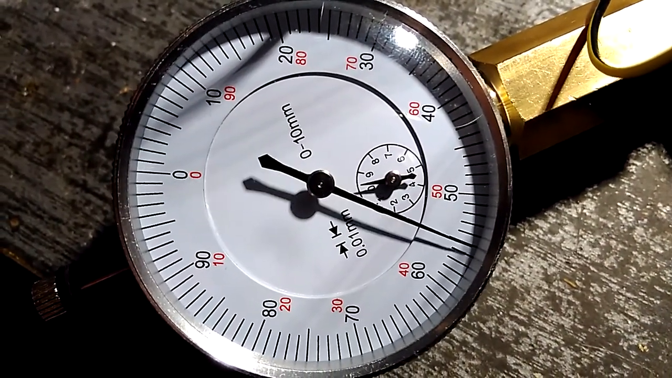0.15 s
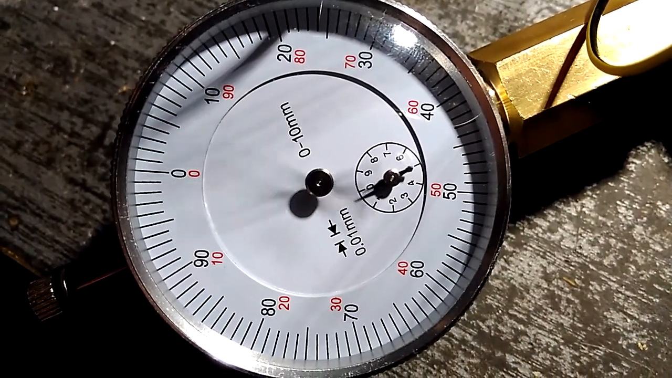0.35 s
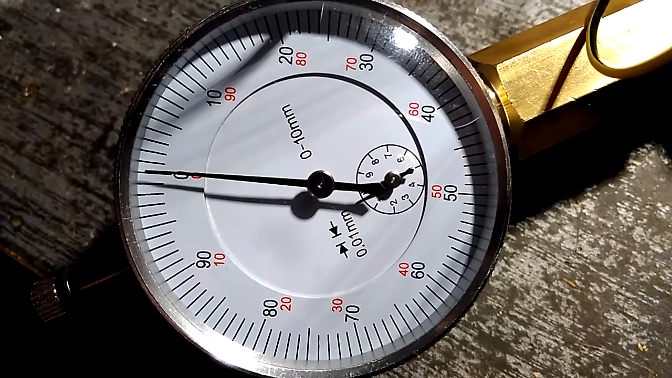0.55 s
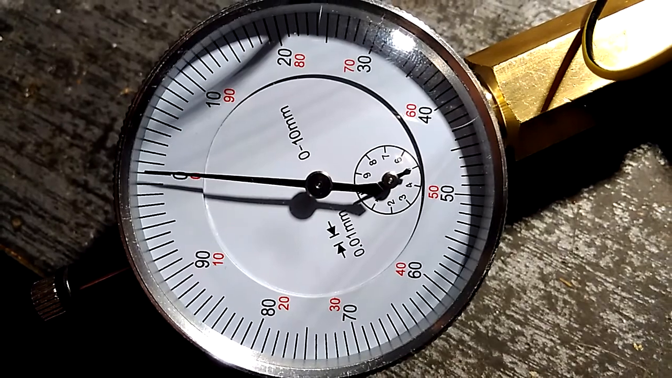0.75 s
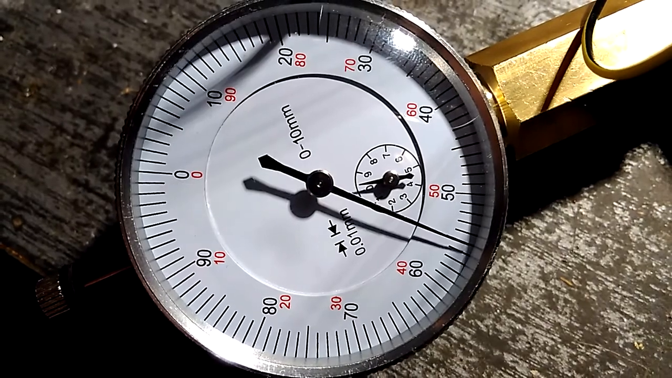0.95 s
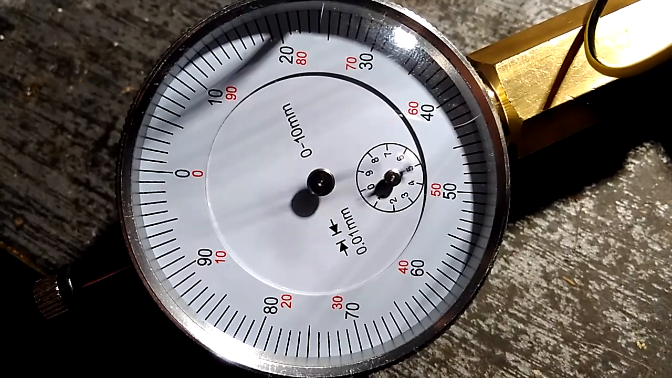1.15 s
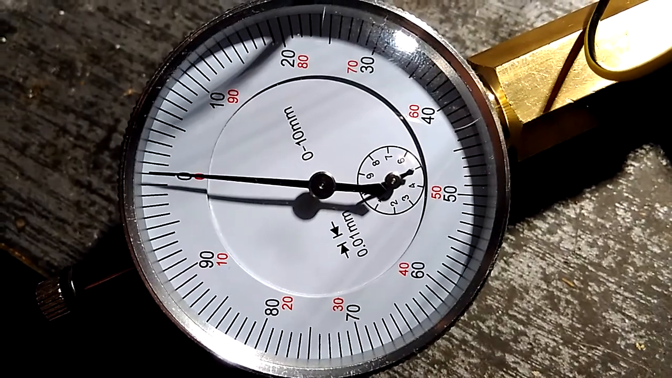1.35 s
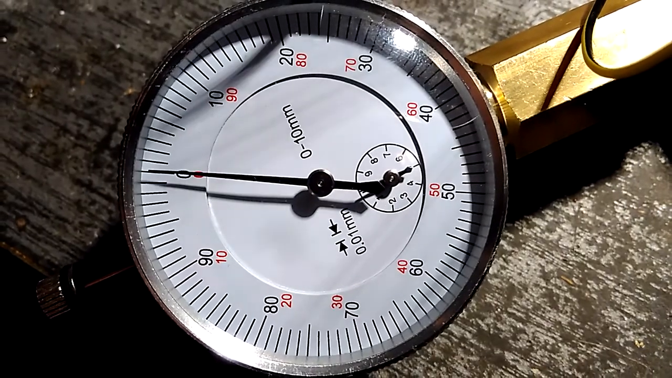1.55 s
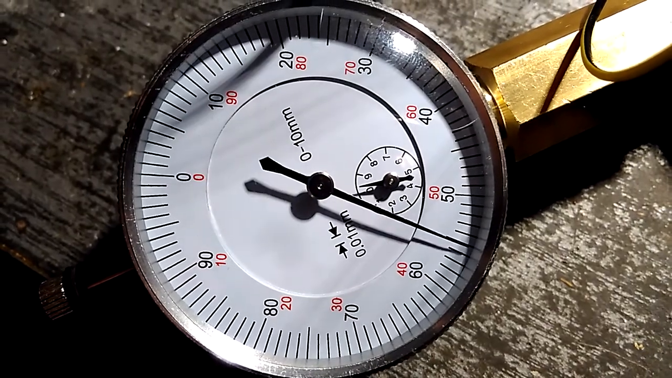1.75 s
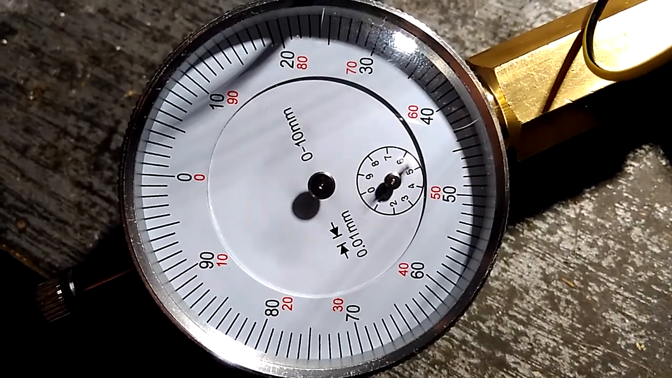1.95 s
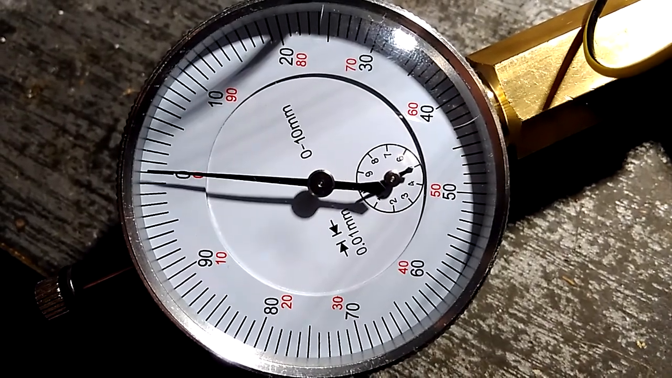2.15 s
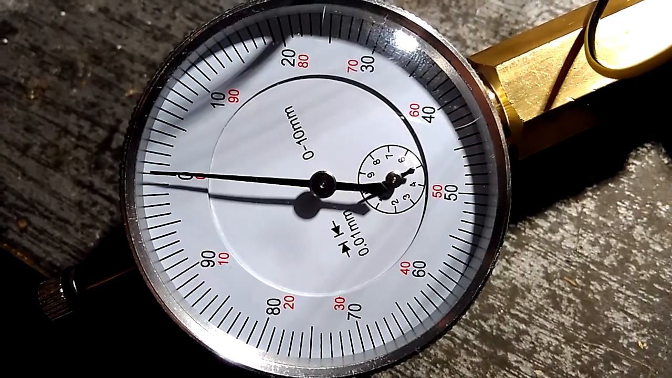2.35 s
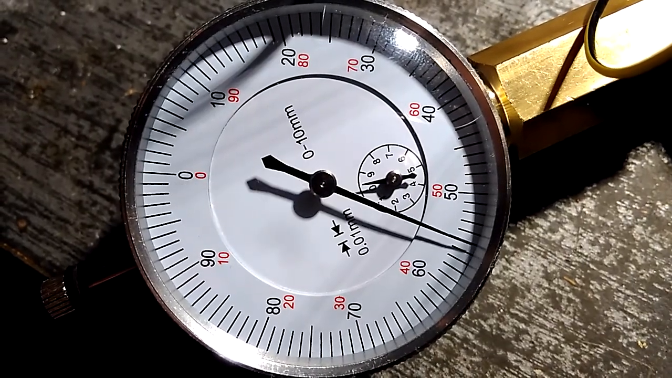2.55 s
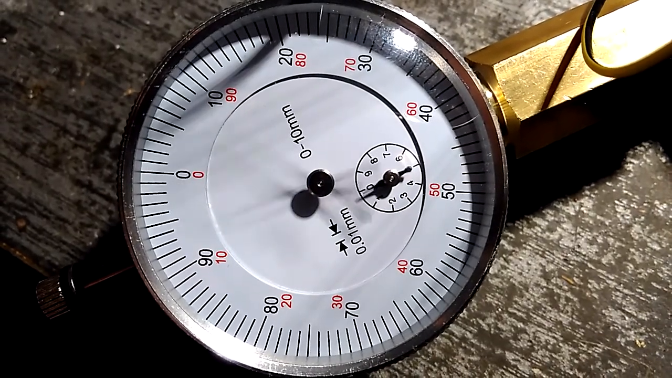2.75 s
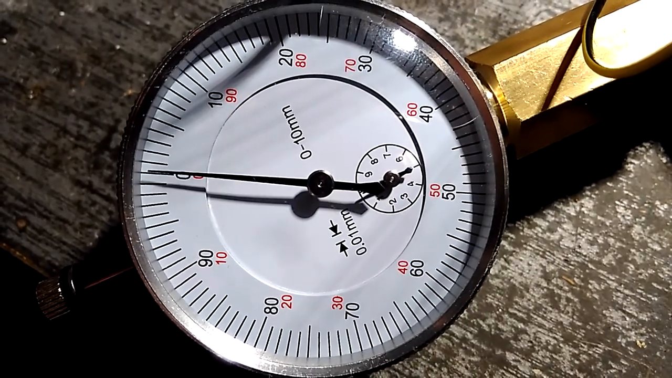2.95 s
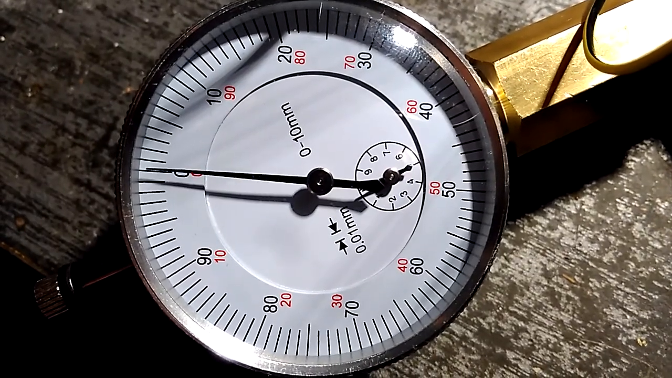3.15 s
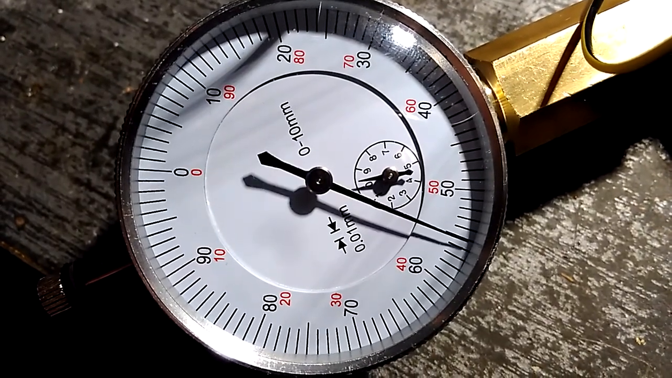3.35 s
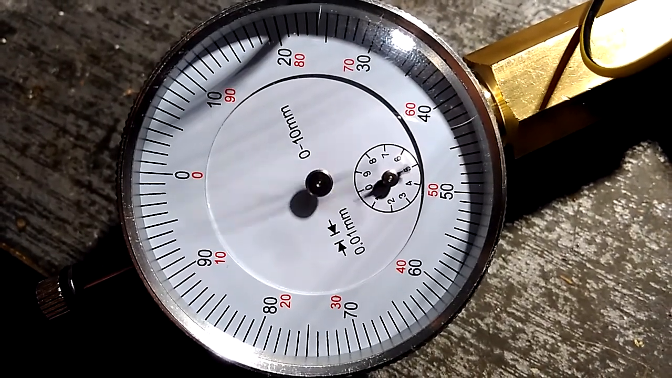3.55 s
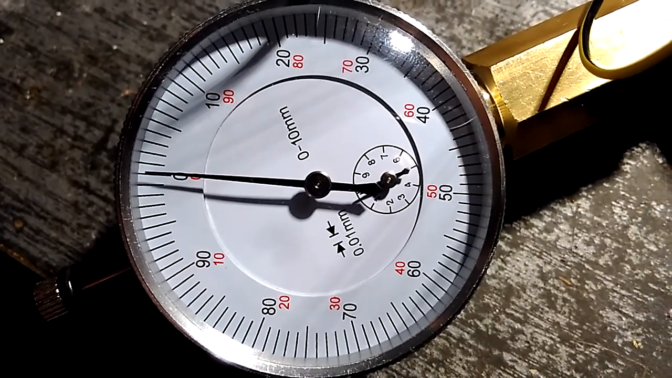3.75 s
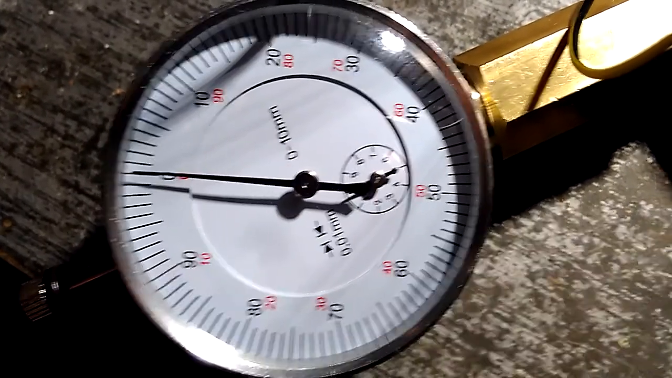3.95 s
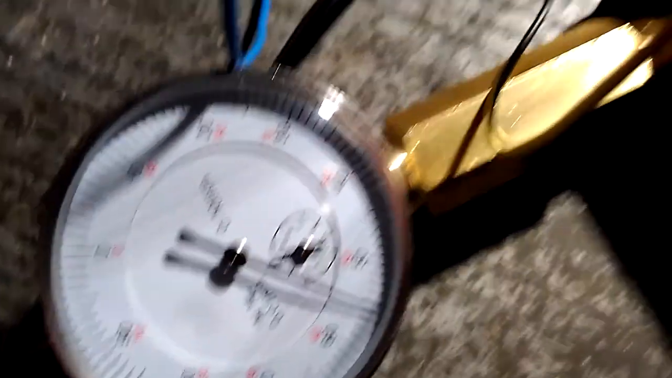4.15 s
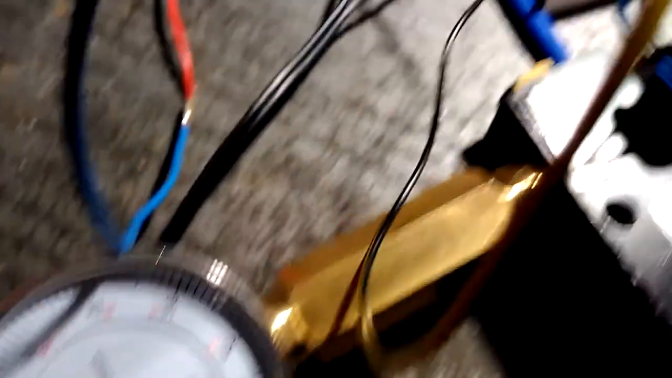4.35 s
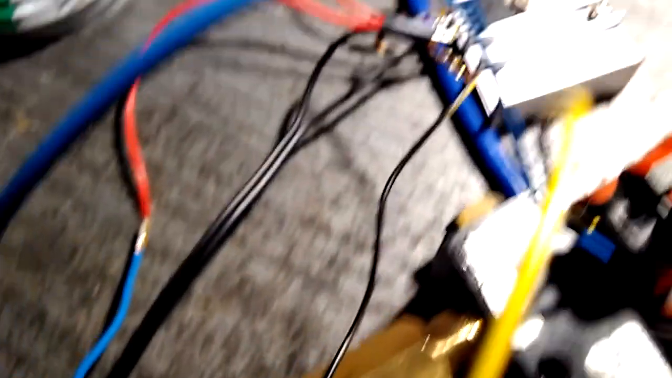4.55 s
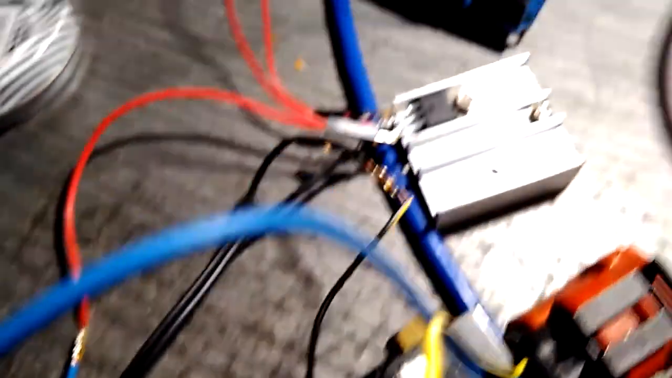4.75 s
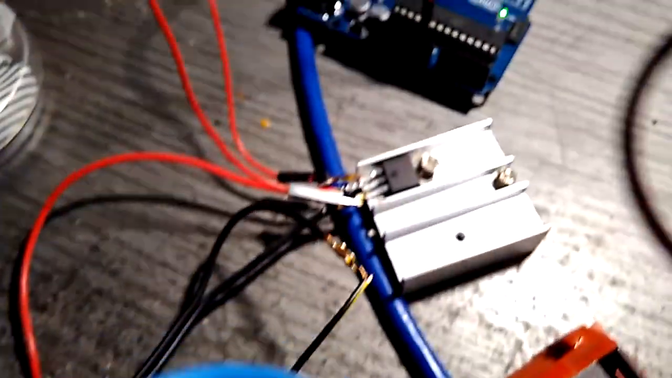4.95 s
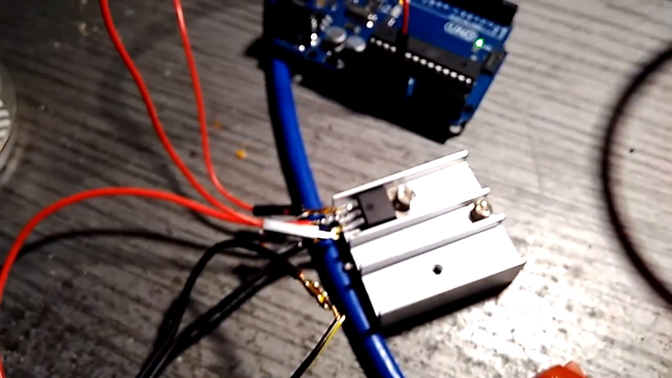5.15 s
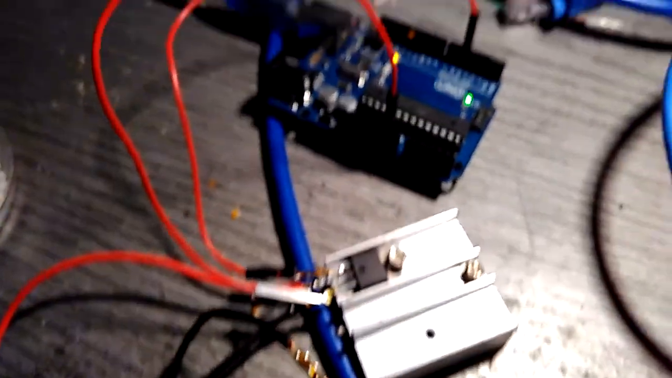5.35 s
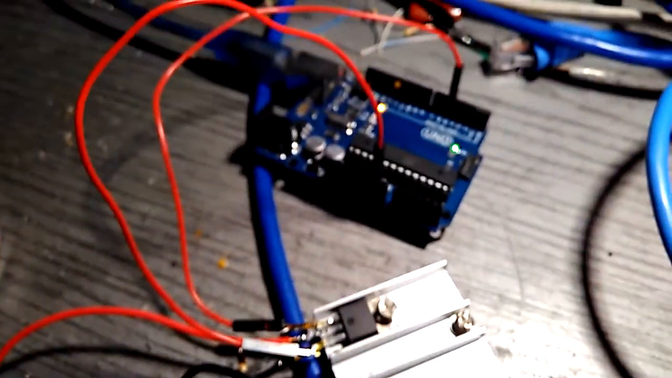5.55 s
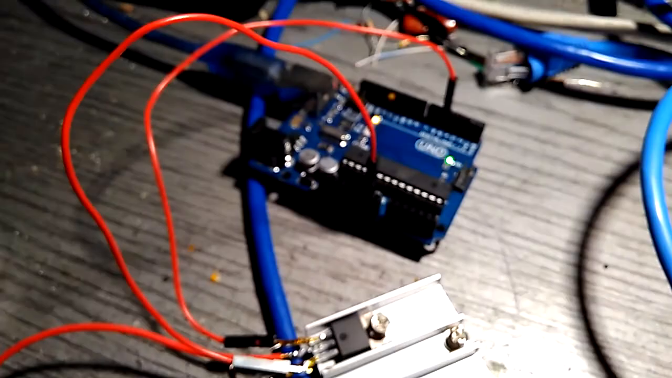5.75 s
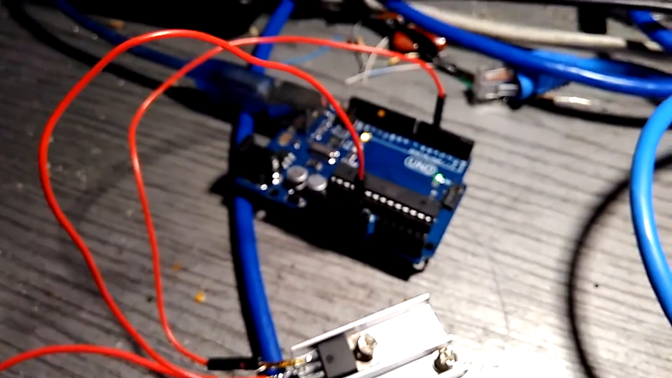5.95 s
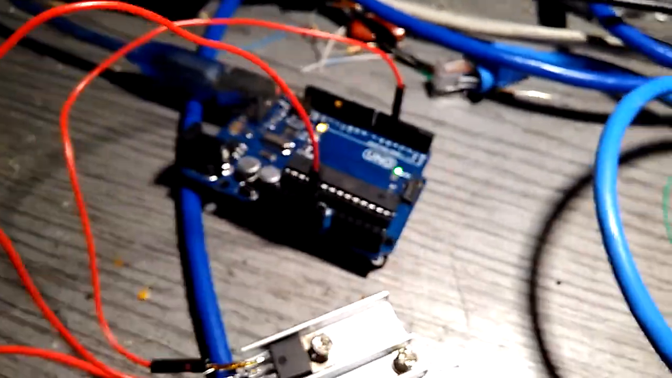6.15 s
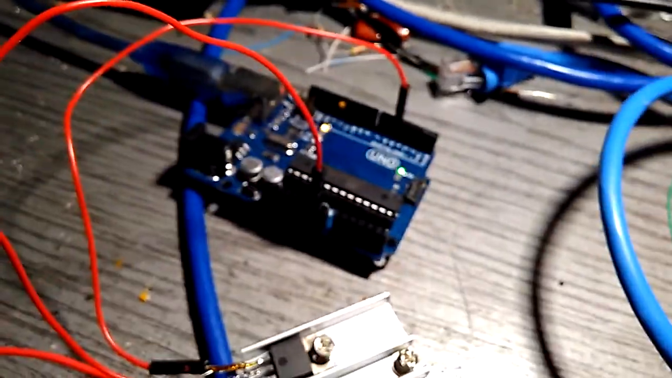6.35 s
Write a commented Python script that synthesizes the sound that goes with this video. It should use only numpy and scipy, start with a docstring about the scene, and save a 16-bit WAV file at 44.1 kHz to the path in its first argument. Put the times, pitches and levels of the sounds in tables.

```python
"""Faint hum and air noise of a quiet small room, at once broken by the steel clack of a fuel injector.
It is switched open and shut every 0.8 s. A dial gauge rests on its plunger: each stroke is a clack,
a short whirr of gears and a second clack as the needle stops, all noise bursts ringing the body's modes.
Hiss is filtered noise and the few thin whistles are gliding sines. The hand-held camera hovers close by,
lifts away, ticks twice and is bumped once near the end; damped sines make these touches."""
import sys
import numpy as np
from scipy import signal
from scipy.fft import rfft, irfft, next_fast_len
from scipy.io import wavfile
from scipy.ndimage import map_coordinates

SR = 44100
rng = np.random.default_rng(int(sys.argv[2]) if len(sys.argv) > 2 else 0)


def dump_mix(stems):
    """Bounce the given channels to the path in sys.argv[1] as a 16-bit WAV at rate SR."""
    frames = np.atleast_2d(stems).T  # one column per channel
    limited = np.clip(frames, -1, 1)  # hard clip at full scale
    pcm = np.round(limited * 32767).astype(np.int16)
    wavfile.write(sys.argv[1], SR, pcm)


N = 281799
TIME = np.arange(N) / SR

# spectrum of the room air before its level is set: [frequency_hz, relative_db]
AIR_COLOUR = [(25, -14.5), (62, 9.5), (110, 8), (170, 5), (300, -3), (1000, -10), (2500, -18), (5000, -21),
              (8000, -18.5), (11000, -17.5), (13200, -17), (14100, -19), (14500, -47)]
# spectrum of the hiss before its level is set: [frequency_hz, relative_db]
HISS_COLOUR = [(300, -5), (4500, -13.0), (8000, -4.5), (11500, 0), (12800, -2), (12980, 4),
               (13200, -2), (14100, -3.0), (14500, -40.5)]
# course of the hiss, before the balance of the ports: [time_s, level_db]
HISS_COURSE = [(0.0, -81), (0.36, -67), (1.74, -79), (1.9, -70), (2.49, -82), (2.65, -73.5), (4.02, -70),
               (4.27, -62.5), (6.39, -70.5)]
# thin whistles, each a shallow arch in pitch: [start_s, length_s, glide_hz, level_db]
WHISTLE_EVENTS = [(0.18, 0.094, 400, -63), (.63, 0.14, 0, -57.5), (3.106, 0.12, 103, -67.5),
                  (3.71, .1, 100, -61), (3.958, 0.14, 1355, -59)]
WHISTLE_HZ, WHISTLE_ARCH_HZ = 9920, 360
# damped modes of the camera's case when it ticks: [pitch_hz, left_db, right_db, t60_s]
TICK_MODES = [(1630, -28, -39, 0.0033), (3750, -23.5, -42, 0.0074), (5700, -14, -30, 0.0025),
              (11240, 16, -14, 0.0018)]
# damped modes of the camera's case when it is bumped: [pitch_hz, left_db, right_db, t60_s]
BUMP_MODES = [(55, -38, -33, 0.1), (490, -33.5, -20, 0.0058), (1250, -29.5, -17, 0.0033),
              (2230, -27, -17.5, 0.0031), (4100, -39, -28.5, 0.018), (7000, -21, -35, 0.0028),
              (10640, -13, -24, 0.0031)]
# ticks on the camera's case: [start_s, relative_db]
TICK_EVENTS = [(4.1595, -26.5), (5.4358, 0)]
BUMP_S = 6.1004
# likeness of diffuse noise at the two ports: [frequency_hz, correlation]
PORT_LIKENESS = [(60, -0.58), (130, -0.98), (300, -.65), (1400, -0.064), (3100, .2), (7000, 0)]
# colour of the left microphone port: [frequency_hz, gain_db]
LEFT_COLOUR = [(400, 0.5), (2500, 0.5), (3400, 1.5), (5500, 1), (9600, -0.5), (10500, 7.5), (11800, 4),
               (12800, 1), (13400, 6.5), (14500, -2)]
# colour of the right microphone port: [frequency_hz, gain_db]
RIGHT_COLOUR = [(400, -4), (2500, -2), (3400, 1), (6900, 1), (8050, 15), (8700, 4), (9200, 8), (10400, -4),
                (11500, -11), (12800, -13), (13700, -8)]
# reverberation time of the room: [frequency_hz, t60_s]
ROOM_DECAY = [(150, 0.81), (600, 0.33), (3000, 0.26), (8000, 0.28), (13000, 0.26)]
# colour of the room's echo: [frequency_hz, gain_db]
WALL_COLOUR = [(130, -5.0), (400, -17.0), (1000, -16.5), (3000, -21.5), (5000, -15.0), (8000, -18.5),
               (11300, -14.0), (14000, -18.5)]
# decay [frequency_hz, t60_s] and colour [frequency_hz, gain_db] of the lingering treble haze
HAZE_DECAY = [(1000, 1.3), (10000, 1.7)]
HAZE_COLOUR = [(500, -36.5), (3000, -46.5), (5000, -48.5), (8000, -40.5), (11000, -35)]
# decay [frequency_hz, t60_s] and colour [frequency_hz, gain_db] of the boom in bench and room
BOOM_DECAY = [(100, .42), (300, 0.14)]
BOOM_COLOUR = [(60, -31.0), (105, -13), (135, -9.5), (200, -13.5), (300, -20.0), (600, -48.5), (2000, -89.5)]
# the camera's move: [time_s, share_of_way_from_gauge_to_controller, injector_left_right_db]
CAMERA_PATH = [(4.08, 0, -0.8), (4.38, .75, 0.5), (5.0, 1, 2.5)]
# broad colour of the steel body with gauge and bench: [frequency_hz, gain_db]
BODY_COLOUR = [(40, -33), (130, -19.5), (280, -8), (520, -14.5), (1050, -15.5), (1600, -7), (2050, 1),
               (3400, 5), (4200, -9), (5000, -3), (7000, -2.5), (14000, -2)]
# narrow modes of the same body: [pitch_hz, width_hz, peak_db above the broad colour]
BODY_MODES = [(398, 43, 10), (332, 21, 3.8), (879, 91, 12), (1316.6, 64, 14.9), (2437, 170, 3.9),
              (3040, 110, 6), (3277, 42, 7.2), (3540, 15, 4.6), (4790, 66, 1.3), (5910, 140, 4),
              (10600, 82, 3.7), (11800, 380, 4.1)]
# contacts within an opening stroke, from the plunger's clack to the needle's stop and rebounds:
# [delay_s, relative_db, knock_db, treble_db, rise_s per 60 dB, t60_s]
OPENING_CONTACTS = [(.0006, 0, 6, -1.5, 0.5, 0.032), (.0048, 2, -5.5, -5.5, 1, 0.0079),
                    (0.021, -2.5, 0, -1, 0.06, 0.027), (.0215, 3, -1.5, -.5, 0.01, 0.0053),
                    (0.0318, -12, -2.5, -5, 0.2, .055)]
# contacts within a closing stroke:
# [delay_s, relative_db, knock_db, treble_db, rise_s per 60 dB, t60_s]
CLOSING_CONTACTS = [(-.0139, -24, 3, -2, .002, .08), (-.0012, -4, -2, -12, .025, 0.024),
                    (.001, 2, -3.5, 3.5, 0.0044, .018), (.0095, -11, -4, 0.5, .05, .075),
                    (0.0387, -12.5, -7, 3, 0.025, 0.08), (0.0492, -1.5, -1.5, 1.5, .014, .024),
                    (0.0583, -10, 2, -11.5, .008, .042), (.0795, -21.5, -8.5, 2.5, .003, .014),
                    (0.0877, -23, 1, -8.5, .03, .025)]
# colour given by the seat the plunger lands on when opening: [frequency_hz, gain_db]
OPENING_SEAT = [(280, -1), (400, 0), (600, 2), (1000, 2.5), (1650, .5), (2450, -2.5), (3000, -.5),
                (3300, 2), (5500, 1.5), (9000, -.5)]
# colour given by the seat the plunger lands on when closing: [frequency_hz, gain_db]
CLOSING_SEAT = [(170, -2), (290, 2), (410, -4), (600, -3), (900, 0), (1330, -3), (2000, 0), (2480, 2.5),
                (3050, -1), (5000, -1), (13000, 0)]
# the controller's clock: first opening, length of a cycle, time held open
FIRST_OPEN_S, CYCLE_S, HELD_OPEN_S = .0703, .80003, .3115
TOP_HZ = 14500  # upper band limit of the camera's sound


def amp(db):
    """A level in decibels is twenty times the logarithm of an amplitude ratio."""
    return 10 ** (np.asarray(db) / 20)


def unit(x):
    """Dividing by the root mean square gives a signal unit power."""
    return x / np.sqrt(np.mean(x ** 2) + 1e-20)


def along(points, hz):
    """A response given at a few frequencies is interpolated on a logarithmic axis."""
    frequency, value = np.transpose(points)
    return np.interp(np.log(hz + 1), np.log(frequency + 1), value)


def coloured(x, gain):
    """Minimum-phase filtering: folding the cepstrum makes a given gain causal."""
    size = 2 * next_fast_len((x.shape[-1] + SR // 10) // 2)
    log_gain = np.log(np.maximum(gain(np.fft.rfftfreq(size, 1 / SR)), 1e-6))
    cepstrum = irfft(log_gain, size)
    cepstrum[..., 1:size // 2] *= 2
    cepstrum[..., size // 2 + 1:] = 0
    response = np.exp(rfft(cepstrum))
    return irfft(rfft(x, size) * response, size)[..., :x.shape[-1]]


def noise_pair(size):
    """Partial coherence: shared and opposed noise set how alike the ports are at each frequency."""
    likeness = along(PORT_LIKENESS, np.fft.rfftfreq(size, 1 / SR))
    turn = np.arccos(np.clip(likeness, -1, 1)) / 2
    spectra = rfft(rng.standard_normal((2, size)))
    mid, side = irfft(spectra * [np.cos(turn), np.sin(turn)], size)
    return np.array([mid + side, mid - side])


def three_bands(x, knock_hz=750, treble_hz=4300):
    """Complementary crossovers part a sound into knock, middle and treble that sum to it."""
    size = x.shape[-1]
    hz, spectrum = np.fft.rfftfreq(size, 1 / SR), rfft(x)
    knock = 1 / (1 + (hz / knock_hz) ** 6)
    below_treble = 1 / (1 + (hz / treble_hz) ** 8)
    parts = (knock, below_treble - knock, 1 - below_treble)
    return np.array([irfft(spectrum * part, size) for part in parts])


def hum(hz=120, left_db=-74, right_db=-79, waver_db=3.0):
    """Mains hum is a steady tone, here slowly modulated in strength and phase."""
    swell, drift = (map_coordinates(rng.standard_normal(size=90), [TIME * 13]) for _ in range(2))
    tone = np.sin(2 * np.pi * hz * TIME + drift / 2)
    return tone * amp(waver_db * swell) * amp([[left_db], [right_db]])


def background(air_db=-65.5, hiss_left_db=1, hiss_right_db=-6):
    """Broadband noise shaped in frequency makes room air and a hiss that comes and goes; hum is added."""
    air = amp(air_db) * unit(coloured(noise_pair(N), lambda hz: amp(along(AIR_COLOUR, hz))))
    fizz = unit(coloured(noise_pair(N), lambda hz: amp(along(HISS_COLOUR, hz))))
    hiss = amp(np.interp(TIME, *np.transpose(HISS_COURSE))) * fizz
    return air * amp([[1.2], [-1.2]]) + hiss * amp([[hiss_left_db], [hiss_right_db]]) + hum()


def whistles(waver_hz=90, left_db=-1, right_db=-9):
    """Frequency modulation: each thin whistle is a sine whose phase sums a gliding, arched pitch."""
    out = np.zeros(N)
    for start, length, glide_hz, db in WHISTLE_EVENTS:
        u = np.linspace(0, 1, int(length * SR))
        pitch = WHISTLE_HZ + glide_hz * (u - .5) - WHISTLE_ARCH_HZ * (2 * u - 1) ** 2
        pitch += waver_hz * map_coordinates(rng.standard_normal(size=40), [u * 39])
        swell = np.sqrt(np.abs(np.sin(np.pi * u)))
        tone = np.sin(2 * np.pi * np.cumsum(pitch) / SR)
        out[round(start * SR):][:len(u)] += amp(db) * swell * tone
    return out * amp([[left_db], [right_db]])


def tap(start, modes, rise):
    """Modal decay: one touch on the camera's case rings a few well-damped modes."""
    out, t = np.zeros((2, N + SR)), np.arange(SR // 5) / SR
    for hz, left_db, right_db, t60 in modes:
        ring = np.sin(2 * np.pi * hz * t) * amp(-60 * t / t60) * (1 - np.exp(-t / rise))
        out[:, round(start * SR):][:, :len(t)] += amp([[left_db], [right_db]]) * ring
    return out[:, :N]


def handling():
    """Structure-borne impulses reach the ports as ticks, stronger at the left, and then a bump."""
    ticks = sum(amp(db) * tap(start, TICK_MODES, rise=0.00048) for start, db in TICK_EVENTS)
    return ticks + tap(BUMP_S, BUMP_MODES, rise=0.00012)


def room(x, t60_points, build):
    """Diffuse reverberation: noise builds up briefly and dies at each frequency's own rate."""
    hz, t, spectrum = signal.stft(noise_pair(SR), SR, nperseg=256)
    fade = amp(-60 * t / along(t60_points, hz)[:, None])
    growth = 1 - np.exp(-t / build)
    tail = signal.istft(spectrum * fade * growth, SR, nperseg=256)[1]
    # the left channel alone serves as the source
    return signal.fftconvolve(x[:1], tail / np.linalg.norm(tail[0]), axes=1)[:, :N]


def afterglow(x):
    """Long treble decay leaves a faint haze after each stroke."""
    haze = room(x, HAZE_DECAY, build=.03)
    return coloured(haze, lambda hz: amp(along(HAZE_COLOUR, hz))) * amp([[1], [-3]])


def bench_boom(x):
    """Delayed build-up: each jolt sets off a low boom in bench and room that swells a moment later."""
    swell = room(x, BOOM_DECAY, build=0.022)
    return coloured(swell, lambda hz: amp(along(BOOM_COLOUR, hz)))


def camera(s):
    """Position sets level and balance: share of the way moved, and left-right dB of the injector."""
    times, away, pan_db = np.transpose(CAMERA_PATH)
    return np.interp(s, times, away), np.interp(s, times, pan_db)


def moving_away(x, knock_db=-7, treble_db=-1.5):
    """Near-field loss: lifting off the gauge weakens the close knock and a little of the treble."""
    away, _ = camera(TIME)
    padded = np.pad(x, ((0, 0), (0, next_fast_len(N) - N)))
    knock, middle, treble = three_bands(padded)[..., :N]
    return knock * amp(knock_db * away) + middle + treble * amp(treble_db * away)


def ports(x, depth):
    """Port response: full colour for direct sound, evened out for sound from all sides."""
    return coloured(x, lambda hz: amp(depth * np.array([along(LEFT_COLOUR, hz), along(RIGHT_COLOUR, hz)])))


def body(hz):
    """Modal resonance: injector, gauge and bench add narrow power peaks to a broad colour."""
    modes = sum((amp(db) ** 2 - 1) / (1 + (2 * (hz - centre) / width) ** 2)
                for centre, width, db in BODY_MODES)
    return amp(along(BODY_COLOUR, hz)) * np.sqrt(np.abs(1 + modes))


def strokes(first_s, contacts, seat, level_db, away_db, repeat, scatter_db, grain_db):
    """Impact excitation: contacts are bursts of tiny steel impacts, partly alike in every cycle."""
    size, lead = SR // 4, SR // 40
    t, out = (np.arange(size) - lead) / SR, np.zeros((2, N + SR))
    # the same parts meet each time, so a share of the noise power repeats
    habit, share = noise_pair(size), np.clip(repeat, 0, 1)
    # all is still until half a millisecond before the first contact
    moving = np.clip(1 + (t - contacts[0][0]) * 2000, 0, 1)
    for start in np.arange(first_s, N / SR, CYCLE_S):
        away, pan_db = camera(start)
        power = 0  # of knock, middle and treble
        for delay, db, knock_db, treble_db, rise, t60 in contacts:
            envelope_db = -60 * np.maximum((t - delay) / t60, (delay - t) / rise)
            band_db = np.array([[knock_db], [0], [treble_db]])
            power = power + amp(db + scatter_db * rng.normal() + envelope_db + band_db) ** 2
        grain = map_coordinates(rng.standard_normal(size=160), [np.linspace(0, 159, size)])
        teeth = amp(grain_db * grain)
        chatter = three_bands(np.sqrt(share) * habit + np.sqrt(1 - share) * noise_pair(size))
        burst = np.sum(chatter * np.sqrt(power)[:, None], axis=0) * unit(teeth) * moving
        placed = burst * amp(away_db * away) * amp([[pan_db / 2], [-pan_db / 2]])
        out[:, round(start * SR) - lead:][:, :size] += placed
    return coloured(out[:, :N], lambda hz: amp(level_db + along(seat, hz)))


def scene():
    """Superposition: strokes ring the body, fill the room and join the background at the two ports."""
    opening = strokes(FIRST_OPEN_S, OPENING_CONTACTS, OPENING_SEAT, level_db=-17.0, away_db=-2.1,
                      repeat=0.62, scatter_db=0.77, grain_db=1.35)
    closing = strokes(FIRST_OPEN_S + HELD_OPEN_S, CLOSING_CONTACTS, CLOSING_SEAT, level_db=-10, away_db=-3.5,
                      repeat=0.38, scatter_db=0.96, grain_db=1.5)
    direct = coloured(opening + closing, body)
    echo = coloured(room(direct, ROOM_DECAY, build=0.0013), lambda hz: amp(along(WALL_COLOUR, hz)))
    heard = ports(moving_away(direct), depth=1) + ports(echo, depth=.45)
    tails = bench_boom(opening + closing) + afterglow(direct)
    return heard + tails + background() + whistles() + handling()


def record(dry, low_cut_hz=42, bend=.012):
    """Square-law distortion adds a soft thud to hard clacks; peaks clip and the band is limited."""
    bent = np.clip(dry + bend * dry ** 2, -1, 1)

    def band(hz):
        """Magnitude response: a second-order low cut and a very steep high cut."""
        low_cut = hz ** 2 / np.sqrt(hz ** 4 + low_cut_hz ** 4)
        high_cut = 1 / np.sqrt(1 + (hz / TOP_HZ) ** 100)
        return low_cut * high_cut

    return coloured(bent, band)


dry = scene()
out = record(dry)
dump_mix(out)
```